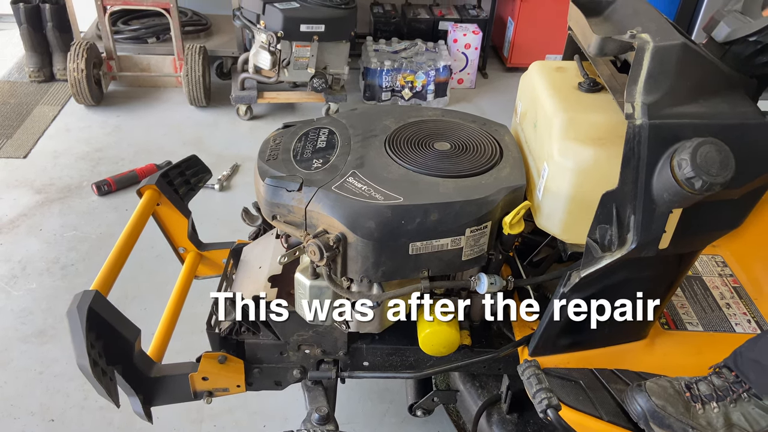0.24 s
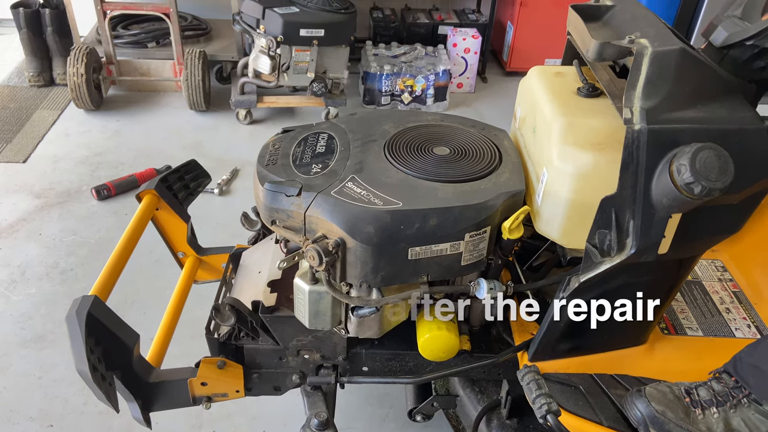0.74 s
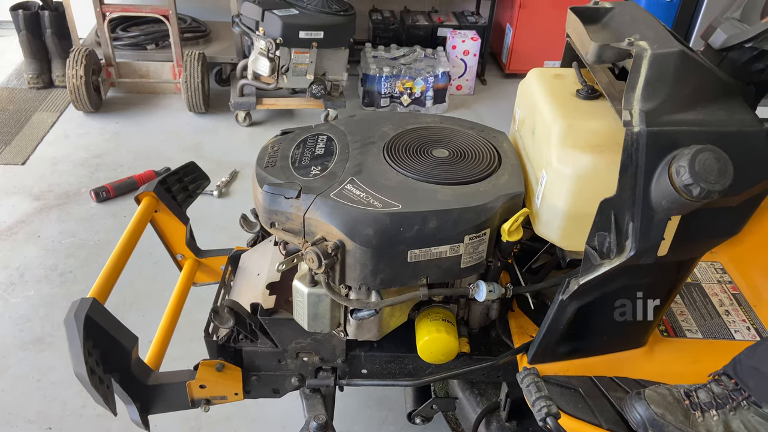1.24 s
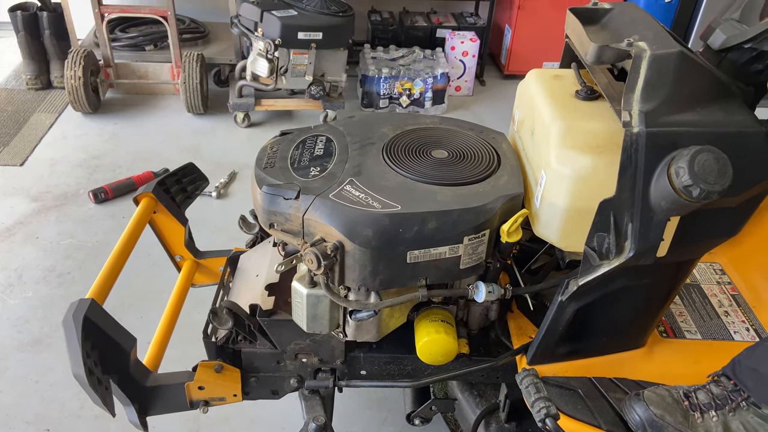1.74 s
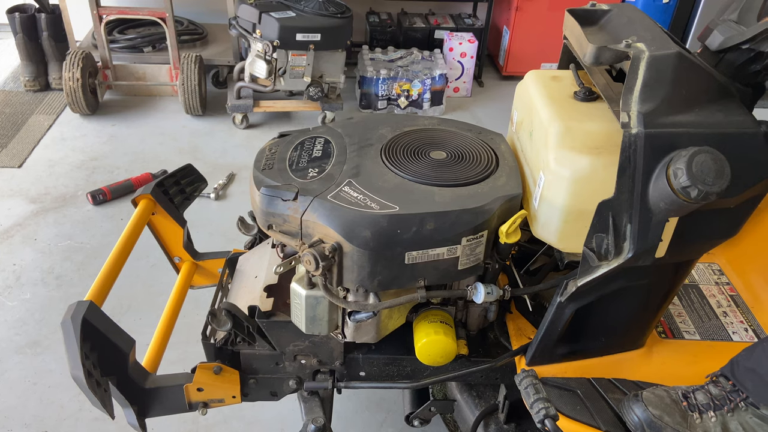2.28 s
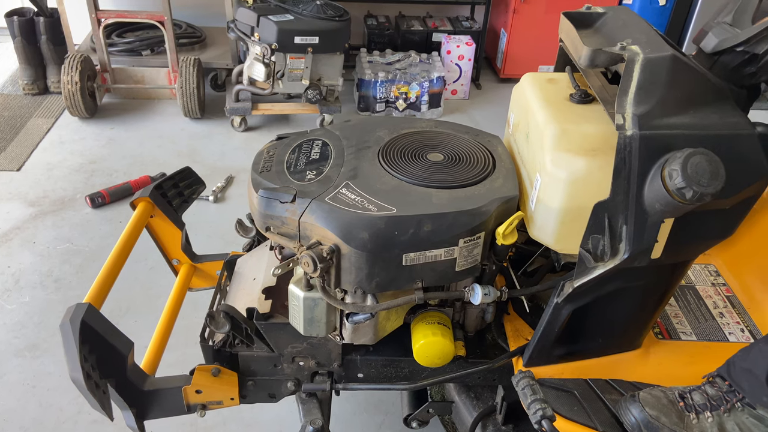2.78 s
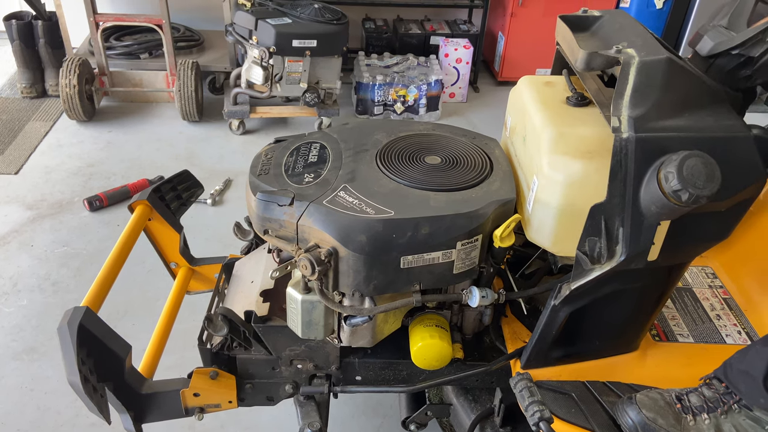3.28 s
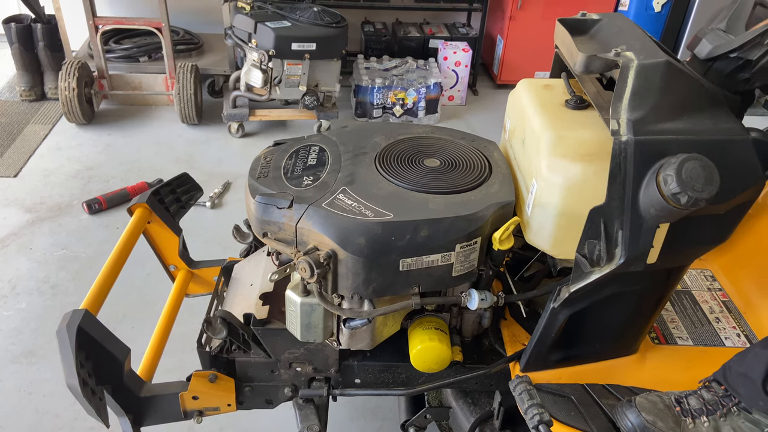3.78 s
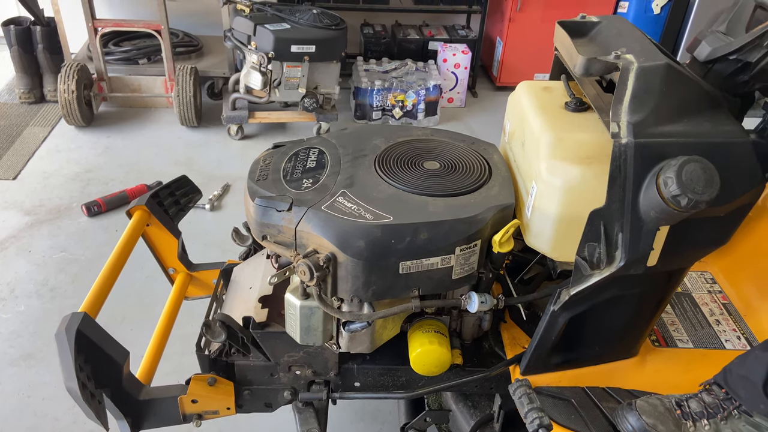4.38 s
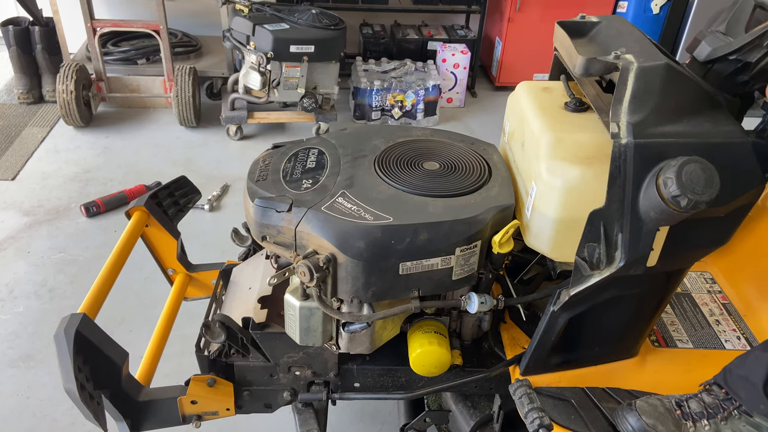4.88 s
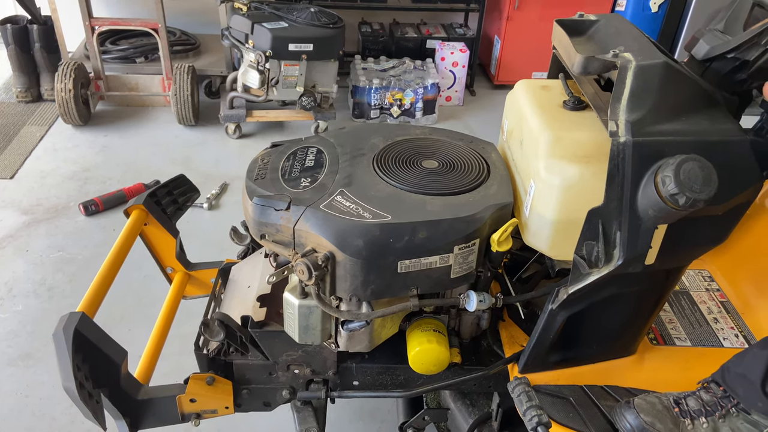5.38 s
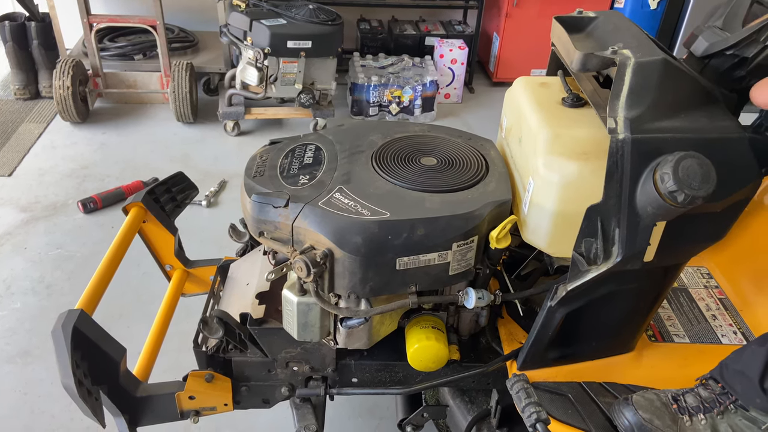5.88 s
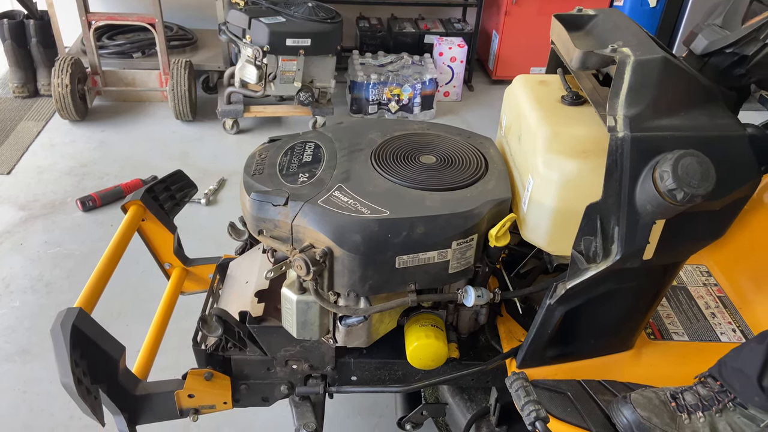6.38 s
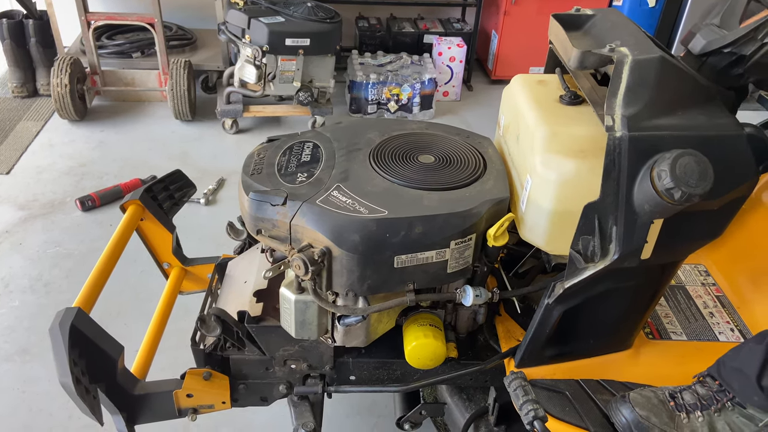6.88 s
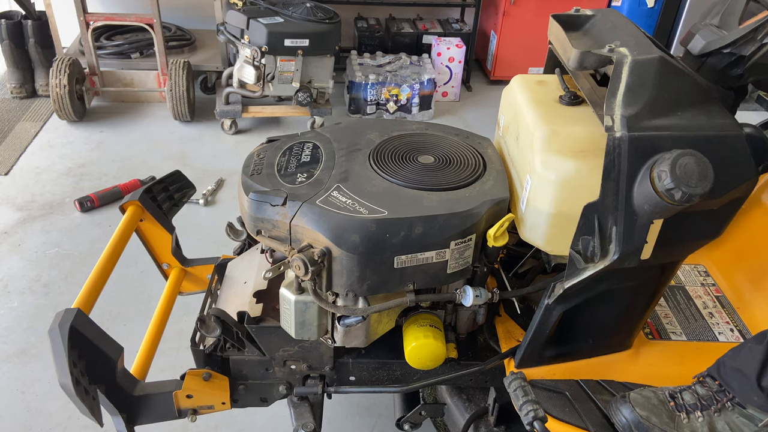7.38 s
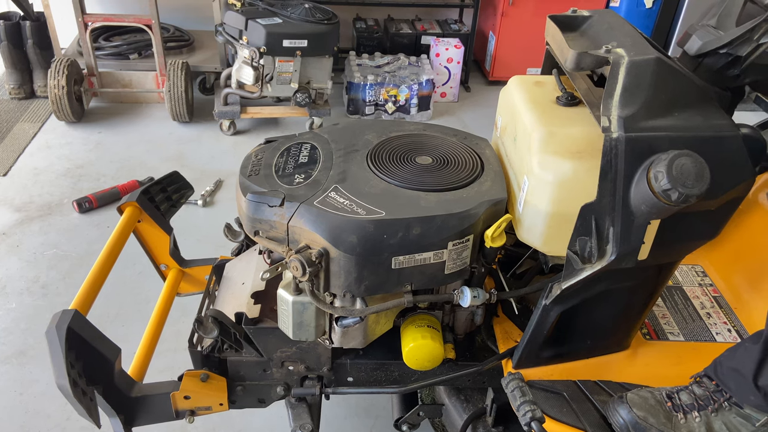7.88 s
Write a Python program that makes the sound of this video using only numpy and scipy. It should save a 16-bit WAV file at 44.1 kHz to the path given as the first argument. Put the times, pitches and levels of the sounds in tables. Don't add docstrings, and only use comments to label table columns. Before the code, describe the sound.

A starter grinds, a small twin-cylinder petrol engine catches, revs up twice with gulping intake, coasts down each time, then is shut off.

```python
import sys
import numpy as np
from scipy import signal
from scipy.fft import rfft, irfft, next_fast_len
from scipy.io import wavfile
from scipy.ndimage import uniform_filter1d

SR = 44100
rng = np.random.default_rng(int(sys.argv[2]) if len(sys.argv) > 2 else 0)


def int16_out(signal):
    q = np.round(np.clip(np.atleast_2d(signal).T, -1, 1) * 32767)
    wavfile.write(sys.argv[1], SR, q.astype(np.int16))


def decibels_to_gain(level_db):
    exponent = np.asarray(level_db, float) / 20
    return 10 ** exponent


N = 358974
T = np.arange(N) / SR

# (time [s], four-stroke cycles per second [Hz])
ENGINE_SPEED = [(0, 10.892), (.73, 17.93), (1.04, 18.205), (1.28, 25.906), (2.28, 25.625), (2.38, 25.258),
                (2.86, 19.218), (3.41, 15.125), (4.23, 14.656), (4.28, 16.129), (4.47, 24.856),
                (4.57, 25.911), (6.07, 25.628), (6.41, 25.827), (6.89, 19.994), (7.28, 16.687),
                (7.77, 14.648), (8.14, 11.478)]
# (lever pushed [s], wide open [s], governed [s], lever back [s], fuel returns [s])
REV_TIMES = [
    (1.03, 1.187, 1.5, 2.35, 2.88),
    (4.153, 4.5, 4.75, 6.43, 7.03),
]
TWIN_GAP = 3 / 8
MISS_S, KEY_OFF_S = 0.185, 7.76
DRIFT_DB_PER_S = -0.17


def evened(x):
    return x / np.sqrt(np.mean(x ** 2) + 1e-20)


def read(points, hz):
    f, value = np.transpose(points)
    return np.interp(np.log(hz + 1), np.log(f + 1), value)


def curves(rows, t):
    s, *columns = np.transpose(rows)
    return [np.interp(t, s, column) for column in columns]


def coloured(x, points):
    size = next_fast_len(N)
    gain = decibels_to_gain(read(points, np.fft.rfftfreq(size, 1 / SR)))
    return irfft(rfft(x, size) * gain, size)[..., :N]


def ring(hz, width_hz):
    r = np.exp(-np.pi * width_hz / SR)
    feedback = [1, -2 * r * np.cos(2 * np.pi * hz / SR), r * r]
    return evened(signal.lfilter([1], feedback, rng.standard_normal((2, N))))


def ports(direct, diffuse):
    # (frequency [Hz], likeness [0-1])
    likeness = [(60, 1), (130, 0.95), (290, 0.84), (640, 0.25), (1400, 0.62), (3100, 0.29), (6800, 0.29),
                (9000, 0.75), (15000, 0.69)]
    # (frequency [Hz], phase [radians])
    left_lead = [(0, 0), (1120, -0.1), (2760, 1.1), (3620, 0.5), (5680, -2.8), (6460, -5.5), (8440, -8.8),
                 (9560, -9.7), (10400, -12.5), (11900, -12.6), (12600, -15.6), (14100, -15.8),
                 (14600, -18.9), (16500, -18.7)]
    # (frequency [Hz], level [dB])
    left_tilt = [(60, 1), (130, 3.5), (290, -1), (640, 1), (1410, 0.5), (3100, 3), (6820, 3), (15000, -1.5)]
    size = next_fast_len(N)
    hz = np.fft.rfftfreq(size, 1 / SR)
    same = np.clip(read(likeness, hz), 0, 1)
    tilt = decibels_to_gain(read(left_tilt, hz) / 2)
    left = rfft(direct, size)
    right = same * left + np.sqrt(1 - same ** 2) * rfft(diffuse, size)
    right = right * np.exp(-1j * read(left_lead, hz))
    return irfft(np.array([left * tilt, right / tilt]), size)[:, :N]


def throttle(t):
    # (steady firing 0-1, pumping against the shut throttle 0-1, beat dB)
    pushed_on, wide_open, held = (1, 0.045, -15.5), (0.63, 0.45, -14.5), (0.83, 0, -17.5)
    shut, starved = (0.25, 0.65, -15), (0, 1, -16.5)
    relit, hunting = (0.73, 0.44, -17), (0.62, 0.13, -19.5)
    on_choke, key_off, dying = (0.67, 0, -13), (0.46, 0.05, -18), (0.4, 0, -23.5)
    shut_s, relight_s, hunt_s = 0.034, 0.11, 0.45
    first_s, first_db, miss_db = 0.16, -14.5, -29
    take_up_s, loaded_s = 0.3, 0.54

    rows = [(first_s - 0.05, 1, 0, miss_db), (first_s, 1, 0, first_db),
            (MISS_S, 1, 0, miss_db), (0.26, *on_choke)]
    load = np.clip((t - take_up_s) / (loaded_s - take_up_s), 0, 1) * (t < REV_TIMES[0][3])
    for pushed, wide, governed, back, fuel in REV_TIMES:
        rows += [(pushed, *pushed_on), (wide, *wide_open), (governed, *held), (back, *held),
                 (back + shut_s, *shut), (fuel, *starved),
                 (fuel + relight_s, *relit), (fuel + hunt_s, *hunting)]
        load = np.maximum(load, np.clip((t - pushed) * 10, 0, 1) * (t < back))
    load[t < take_up_s] = 1
    rows += [(KEY_OFF_S, *key_off), (N / SR, *dying)]
    lit, pumping, beat_db = curves(rows, t)
    return load, np.clip(lit, 0, 1), np.clip(pumping, 0, 1), beat_db + DRIFT_DB_PER_S * t


def levels(t):
    idle_hz, governed_hz = 15, 25.7
    full_surge = 40
    pull_db, surge_db = 2, 6
    speed, = curves(ENGINE_SPEED, t)
    fast = (speed - idle_hz) / (governed_hz - idle_hz)
    later, = curves(ENGINE_SPEED, t + 0.074)
    earlier, = curves(ENGINE_SPEED, t - 0.06)
    surge = np.clip((later - earlier) / 0.16 / full_surge, 0, 1) * (1 - fast / 2)
    choke = np.clip((REV_TIMES[0][1] - t) * 10, 0, 1)
    fan_db = -27 + 5.5 * fast + pull_db * choke + surge_db * surge
    bright = 0.43 + 0.41 * fast + 0.21 * choke - 0.024 * t
    tin_db = -40 + 2 * fast + pull_db * choke
    return fan_db + DRIFT_DB_PER_S * t, np.clip(bright, 0, 1), tin_db + DRIFT_DB_PER_S * t


def starter(gears_db=-8):
    # (frequency [Hz], width [Hz], level [dB])
    gear_rings = [(983, 266, -13), (1190, 23, -23), (1390, 67, 3.5), (2080, 39, 0.5), (3530, 110, -2),
                  (4470, 110, -4.5)]
    # (frequency [Hz], level [dB per Hz])
    grind_colour = [(40, -79), (250, -64), (500, -62), (1250, -65), (2500, -60.5), (5000, -74), (9000, -75),
                    (15000, -90)]
    # (time [s], level [dB])
    grind_level = [(0, -28.5), (.08, -30), (.14, -23), (.2, -28), (.26, -25.5), (.33, -29.5), (.42, -40),
                   (.5, -67)]
    grind = evened(coloured(rng.standard_normal((2, N)), grind_colour))
    gears = sum(decibels_to_gain(db + gears_db) * ring(hz, width_hz) for hz, width_hz, db in gear_rings)
    return (grind + gears) * decibels_to_gain(curves(grind_level, T)[0])


def tin(turns):
    # (frequency [Hz], width [Hz], level [dB])
    panel_rings = [(413.5, 29, 2), (785, 38, 0.5), (964, 62, 1.5), (1078, 7.1, -2.5), (1204, 81, 5),
                   (1365, 106, 1), (1635, 120, -5), (4570, 44, -8.5), (7330, 40, -37)]
    # (frequency [Hz], idling level [dB], governed level [dB])
    whine_tones = [(926, -43, -38), (1225, -43, -46), (1650, -50, -46), (1852, -56, -46), (2740, -44, -58),
                   (4070, -54, -54), (5471, -42.5, -43)]
    panels = sum(decibels_to_gain(db) * ring(hz, width_hz) for hz, width_hz, db in panel_rings)
    panels = panels * decibels_to_gain(levels(T)[2])
    rattle_db = 2.2 * np.interp(5 * turns, np.arange(1000), rng.standard_normal(1000))
    fast = np.clip((curves(ENGINE_SPEED, T)[0] - 17) / 8, 0, 1)
    whines = 0
    for hz, idle_db, fast_db in whine_tones:
        whines = whines + decibels_to_gain(idle_db + fast * (fast_db - idle_db)) * ring(hz, width_hz=14)
    bead_db = 1.5 * np.interp(3 * turns, np.arange(1000), rng.standard_normal(1000))
    choke_db = 2.5 * (T < REV_TIMES[0][0])
    stop_db = -4 * np.clip((T - REV_TIMES[-1][4]) * 2, 0, 1)
    whines = whines * decibels_to_gain(bead_db + choke_db + stop_db) * np.clip((T - MISS_S) * 10, 0, 1)
    return panels * decibels_to_gain(rattle_db * (1 - fast / 2)) + whines


def roar(turns, patchy_db=1.0, throb_db=1.5, throb_angle=0.055):
    # (frequency [Hz], level [dB per Hz])
    idle_colour = [(40, -33), (250, -50), (500, -56), (800, -56.5), (1250, -64), (1700, -67), (2500, -64.5),
                   (3600, -69), (5000, -73.5), (7000, -77.5), (9000, -81.5), (11000, -84), (13000, -84.5),
                   (15000, -89)]
    fast_colour = [(40, -28), (250, -45), (500, -54.5), (800, -54), (1250, -61), (1700, -56), (2500, -59.5),
                   (3600, -64), (5000, -65), (7000, -68.5), (9000, -74.5), (11000, -73), (13000, -78.5),
                   (15000, -84)]
    # (frequency [Hz], level [dB])
    idle_bass = [(40, 4), (200, 7), (500, 0)]
    fast_bass = [(40, -6), (130, -1), (250, 3), (500, 0)]
    frames, hz = N // 128 + 5, np.fft.rfftfreq(512, 1 / SR)
    t = np.arange(frames) * 128 / SR
    a, b, c, d, patches = rng.standard_normal((frames, 257, 5)).T
    patches = uniform_filter1d(patches, size=8, axis=0)
    patches = evened(uniform_filter1d(patches, size=10, axis=1))
    level_db, bright, _ = levels(t)
    level_db = level_db + 4.5 - 14 * np.clip(1 - t / 0.23, 0, 1)

    idle = read(idle_colour, np.maximum(hz, 500)) - read(idle_colour, 1066)
    fast = read(fast_colour, np.maximum(hz, 500)) - read(fast_colour, 1066)
    colour = idle[:, None] + bright * (fast - idle)[:, None]
    steady = np.clip((curves(ENGINE_SPEED, t)[0] - 23.5) / 2, 0, 1)
    colour = colour + np.outer(read(idle_bass, hz), 1 - steady)
    colour = colour + np.outer(read(fast_bass, hz), steady)
    z = np.array([a + 1j * b, c + 1j * d]) * decibels_to_gain(colour + level_db + patchy_db * patches)
    air = 1.926 * signal.istft(z, nperseg=512, noverlap=384)[1][:, :N] / np.sqrt(512)
    throb = sum(np.cos(np.pi * (turns - throb_angle - k)) ** 20 for k in (0, TWIN_GAP))
    return air * decibels_to_gain(throb_db * throb)


def valve_gulps(turns):
    # (throttle open [s], governor closes [s], level [dB], knock [dB])
    gulp_runs = [
        (1.06, 1.203, -7, -17),
        (4.225, 4.433, -8, -19),
    ]
    # (time [s], peak level [dB], knock level [dB])
    stray_gulps = [
        (0.094, -27, -31),
        (0.115, -30, -29),
        (0.1377, -19, -40),
        (0.2156, -17, -22),
        (0.2524, -12.5, -21),
        (0.2974, -19, -31),
        (1.0148, -17.5, -18),
        (3.7736, -37, -42),
        (4.0442, -30, -27),
        (4.1794, -32, -27),
    ]
    valve_angle, valve_gap = 0.68, 0.4
    closing_db_per_s, closing_s = -230, 0.075
    cycles = np.arange(np.floor(turns[-1]))
    angles = np.add.outer(cycles + valve_angle, [0, valve_gap]).ravel()
    s = np.interp(angles, turns, T)
    luck, knock_luck = rng.standard_normal((len(s), 2)).T
    second = np.arange(len(s)) % 2
    rows = list(stray_gulps)
    for opens, closes, db, knock_db in gulp_runs:
        fade_db = closing_db_per_s * np.maximum(s - closes, 0)
        gulp_db = db + fade_db - 3.5 * second + 1.6 * luck
        blow_db = knock_db + fade_db / 2 + 4.5 * knock_luck
        rows += list(np.transpose([s, gulp_db, blow_db])[(s > opens) & (s < closes + closing_s)])
    return rows


def gulps(turns, rise=0.0011, gain_db=-4, tail_db=-11, tail=0.45, knock_db=-1.7):
    # (frequency [Hz], level [dB per Hz])
    rush_colour = [(40, -40), (250, -44), (500, -52), (800, -56), (1250, -52.5), (1700, -57), (2500, -58),
                   (3600, -61.5), (5000, -55), (7000, -58.5), (9000, -59), (11000, -58), (13000, -62.5),
                   (15000, -69)]
    # (frequency [Hz], level [dB], time to fall 60 dB [s])
    case_modes = [(405, 0.5, 0.045), (744, -4, 0.028), (1180, -6, 0.022), (1607, -3.5, 0.033),
                  (1900, -16, 0.026), (2213, -0.5, 0.026), (2980, -6, .025), (4670, -8, 0.062)]
    shape, knocks, age = np.zeros(N), np.zeros(N), T[:SR // 2]
    luck = rng.standard_normal((64, len(case_modes), 2))
    for (s, db, blow_db), chance in zip(valve_gulps(turns), luck):
        start = round(s * SR)
        fall = decibels_to_gain(-60 * age / 0.061) + decibels_to_gain(tail_db - 60 * age / tail)
        rush = decibels_to_gain(db) * np.minimum(age / rise, 1) * fall
        part = shape[start:][:len(rush)]
        part[:] = np.hypot(part, rush)
        for (hz, mode_db, t60), (detune, strength) in zip(case_modes, chance):
            mode = decibels_to_gain(mode_db + 2.5 * strength - 60 * age / t60)
            mode = mode * np.sin(2 * np.pi * hz * (1 + 0.0514 * detune) * age)
            knocks[start:][:len(age)] += decibels_to_gain(blow_db + knock_db) * mode
    crackle = np.interp(T / 0.0015, np.arange(N // 16), rng.standard_normal(N // 16))
    air = evened(coloured(rng.standard_normal((2, N)), rush_colour))
    return decibels_to_gain(gain_db + 3 * crackle) * shape * air + knocks


def beat(gate_angle=0.7, wobble_db=0.5, settle=0.3):
    # (multiple of cycle rate, pulling [dB], idling [dB], governed [dB], coasting [dB])
    order_levels = [(1, -53, -45, -56, -54), (2, -45, -43, -31, -35), (3, -35, -44, -31, -19),
                    (4, -31, -33, -31, -37), (5, -18, -23, -23, -29), (6, -28, -34, -29, -39),
                    (7, -29, -30, -26, -35), (8, -22, -25, -35, -34), (9, -32, -30, -32, -44),
                    (10, -27, -36, -35, -34), (11, -29, -30, -35, -38), (12, -45, -39, -42, -41),
                    (13, -29, -36, -45, -40), (14, -41, -42, -48, -49), (15, -44, -45, -39, -42),
                    (16, -38, -48, -36, -39), (17, -47, -47, -49, -45), (18, -40, -47, -45, -49),
                    (19, -47, -49, -40, -47), (20, -51, -59, -46, -50)]
    # (exhaust angle [cycles], intake angle [cycles], first exhaust [dB],
    # first intake [dB], second intake [dB], pipe lag [radians])
    puff_states = [
        (0.826, 0.572, -12, -15, -5, 0.2),
        (0.894, 0.612, -1, -2, -1, -1.3),
        (0.716, 0.405, -1, 4, -14, 2.5),
        (0.763, 0.513, -15, -15, 0, 1.5),
    ]
    # (time [s], strength [0-1])
    lean_catches = [(2.9, 0.6), (3.01, 0.87), (3.12, 0.66), (3.24, 0.67), (3.31, 0.83), (3.57, 0.8),
                    (6.77, 0.6), (6.87, 1), (6.97, 1), (7.02, 0.96), (7.13, 1), (7.24, 0.84), (7.3, 0.6),
                    (7.37, 0.63), (7.43, 0.75), (7.55, 0.94), (7.62, 0.95), (7.68, 1), (7.75, 0.76)]
    t = T[::16]
    speed, = curves(ENGINE_SPEED, t)
    turns = np.cumsum(speed) * 16 / SR
    order, *state_db = np.transpose(order_levels)
    order = np.round(order)
    spin = np.exp(2j * np.pi * order[:, None] * turns)
    waves = []
    for db, (exhaust, intake, first_db, intake_db, second_db, lag) in zip(state_db, puff_states):
        at = np.array([exhaust, exhaust + TWIN_GAP, intake, intake + TWIN_GAP])
        puff_gain = decibels_to_gain(np.array([first_db, 0, intake_db, second_db]))
        puffs = puff_gain @ np.exp(-2j * np.pi * np.outer(at, order))
        waves.append(((decibels_to_gain(db) * np.exp(1j * (np.angle(puffs) - lag))) @ spin).real)
    pulling, idling, governed, coasting = waves

    load, lit, pumping, beat_db = throttle(t)
    fast = np.clip((speed - 20.5) / 3.7, 0, 1)
    slow_fired = load * pulling + (1 - load) * idling
    fired = np.sqrt(1 - fast) * slow_fired + np.sqrt(fast) * governed
    cycle = np.floor(turns - gate_angle)
    for s, strength in lean_catches:
        lit = np.where(cycle == cycle[np.searchsorted(t, s)], strength, lit)
    wave = uniform_filter1d(lit, size=25) * fired + pumping * coasting

    thump = signal.sosfiltfilt(signal.butter(2, 80, fs=SR / 16, output="sos"), wave)
    wave = wave - 0.7 * np.clip((t - KEY_OFF_S) / 0.1, 0, 1) * thump
    slow = np.sqrt(uniform_filter1d(wave ** 2, size=int(settle * SR / 16)) + 1e-9)
    uneven = np.interp(4 * turns, np.arange(800), rng.standard_normal(800))
    wave = wave / slow * decibels_to_gain(beat_db + wobble_db * (2 - fast) ** 2 * uneven)
    caught = np.clip((t - 0.13) / 0.024, 0, 1)
    return signal.resample_poly(wave * caught, up=16, down=1)[:N], np.interp(T, t, turns)


def scene(echo_db=-17):
    low, turns = beat()
    noise = roar(turns) + tin(turns) + gulps(turns) + starter()
    echo = np.roll(low, int(0.011 * SR)) - np.roll(low, int(0.0097 * SR))
    echo = decibels_to_gain(echo_db) * echo
    return ports(*noise) + low + np.array([echo, -echo])


def top_cut(x):
    return signal.sosfilt(signal.butter(12, 16890, fs=SR, output="sos"), x)


def record(dry):
    cut = signal.sosfiltfilt(signal.butter(3, 38, "high", fs=SR, output="sos"), dry)
    ceiling = 1.25
    edge = signal.firwin(511, 16000, window=("kaiser", 9), fs=SR)
    limited = signal.oaconvolve(ceiling * np.tanh(cut / ceiling), edge[None], "same")
    return top_cut(limited)


dry = scene()
out = record(dry)
int16_out(out)
```